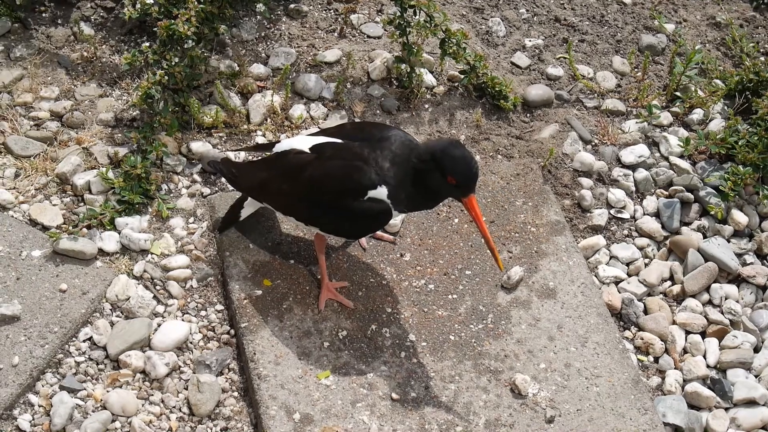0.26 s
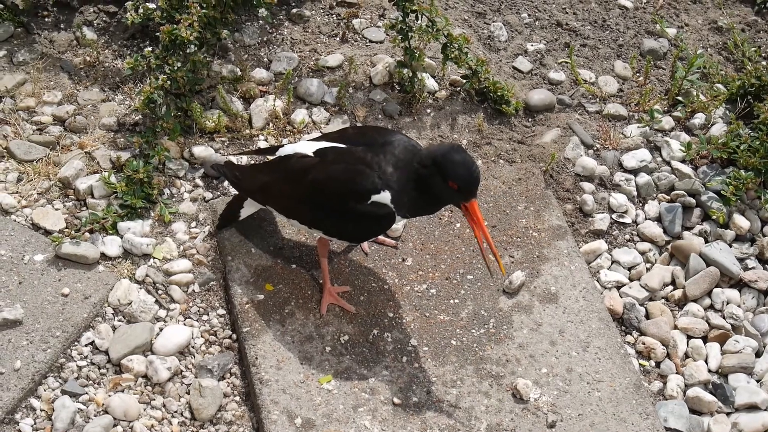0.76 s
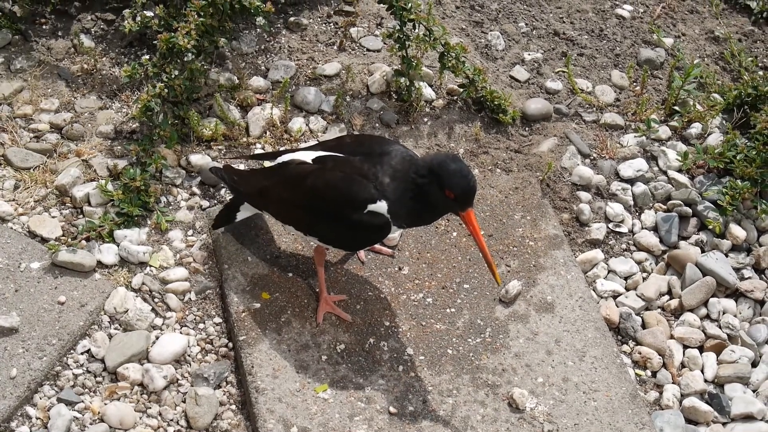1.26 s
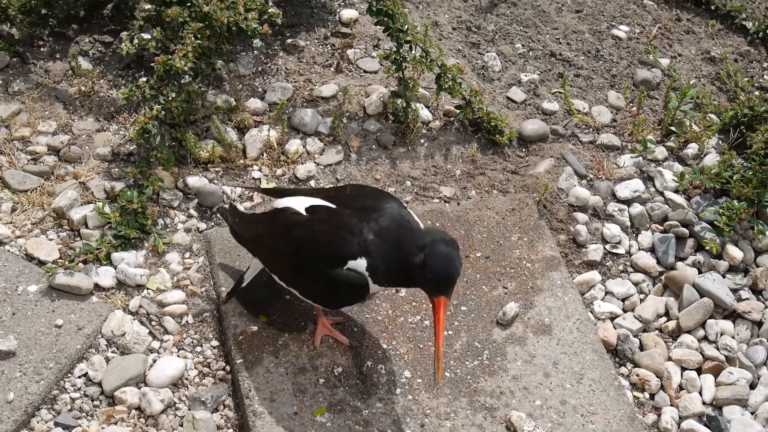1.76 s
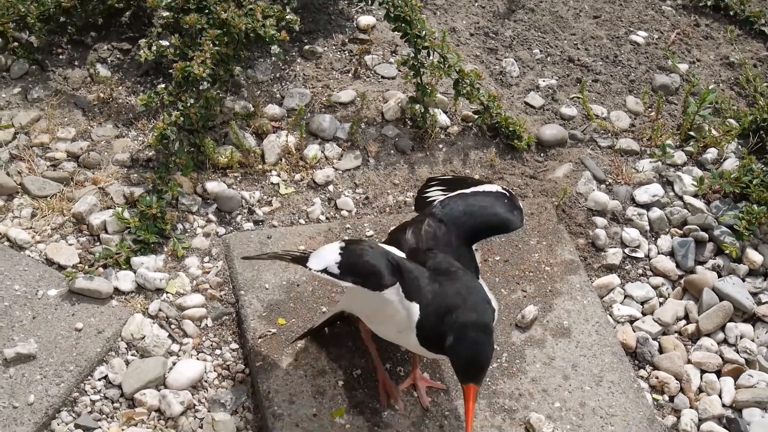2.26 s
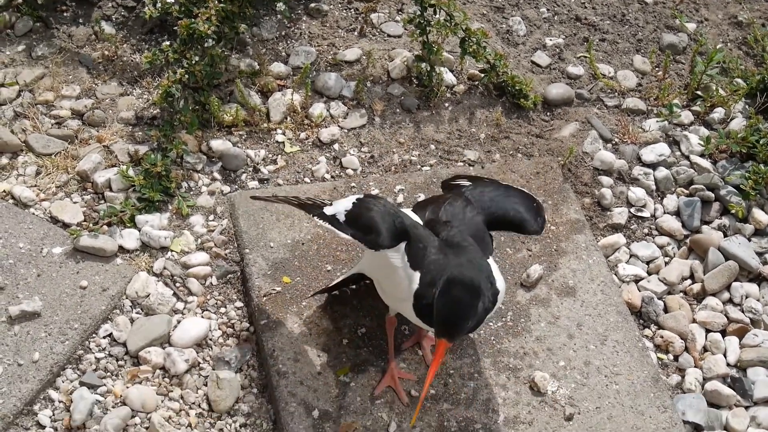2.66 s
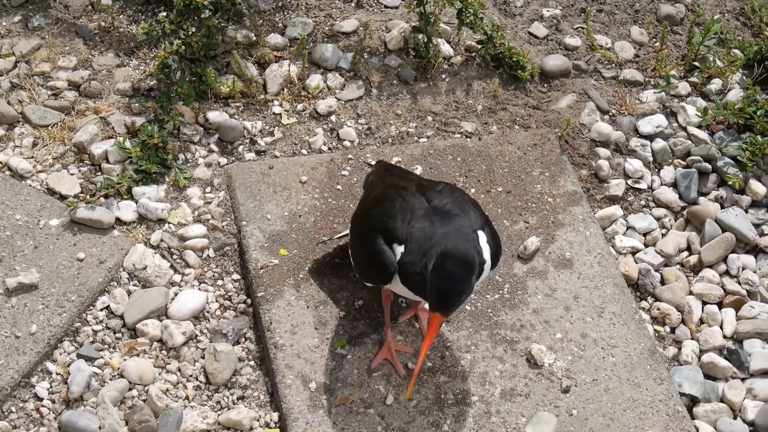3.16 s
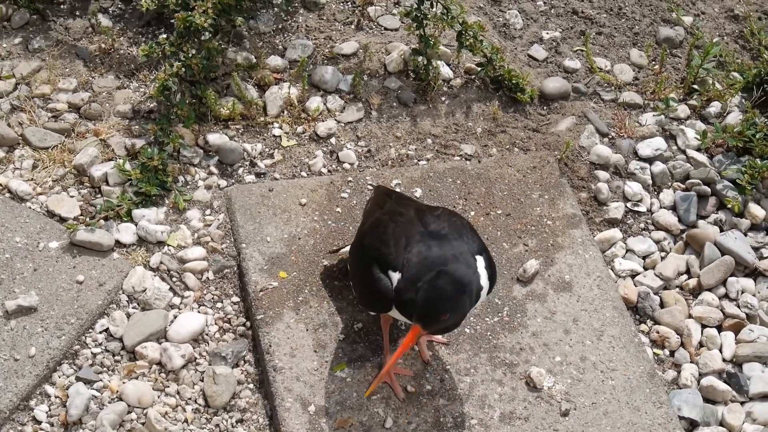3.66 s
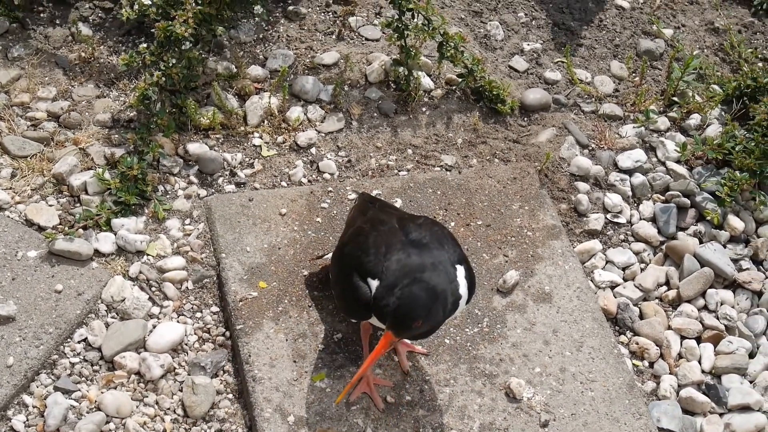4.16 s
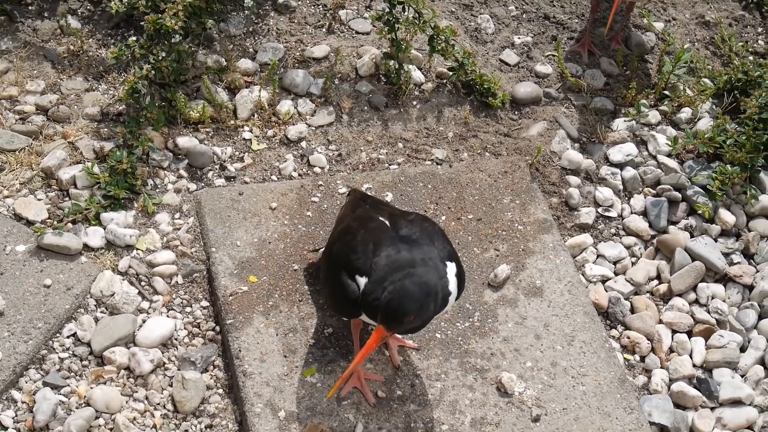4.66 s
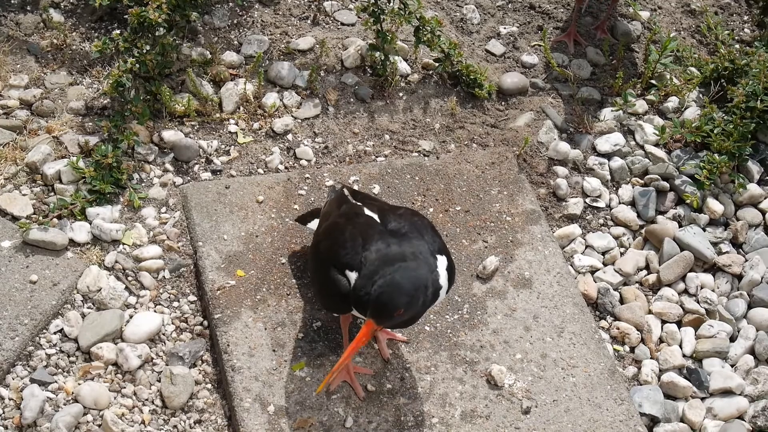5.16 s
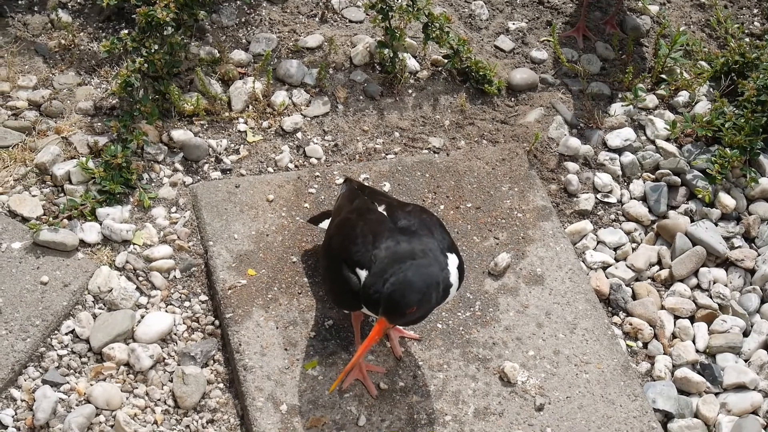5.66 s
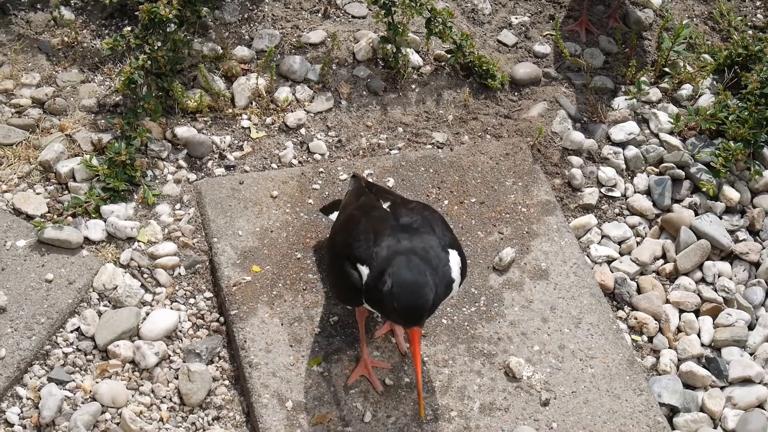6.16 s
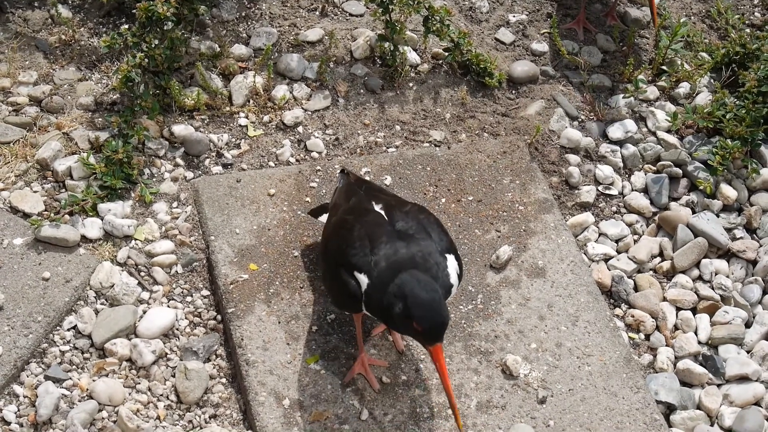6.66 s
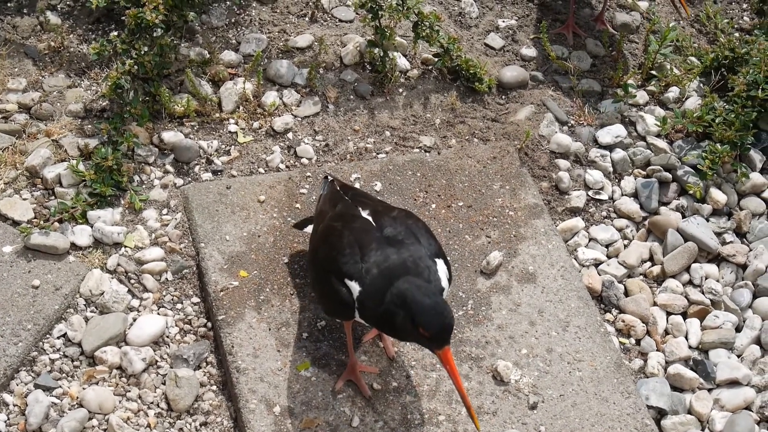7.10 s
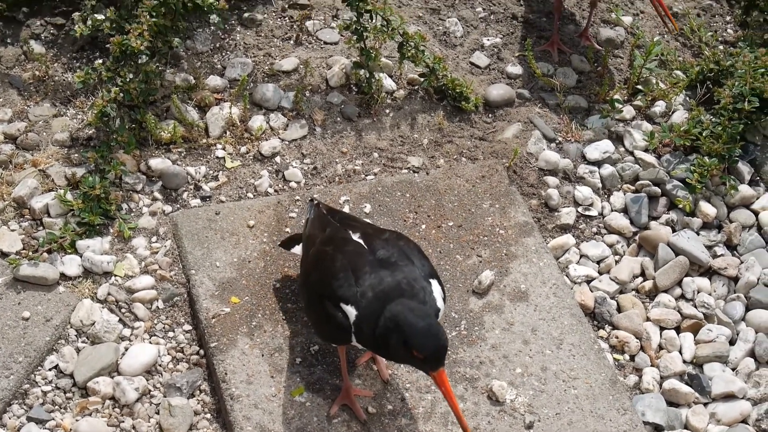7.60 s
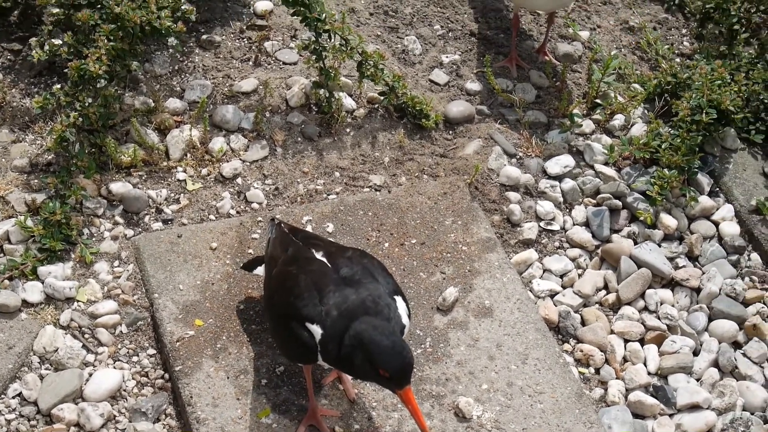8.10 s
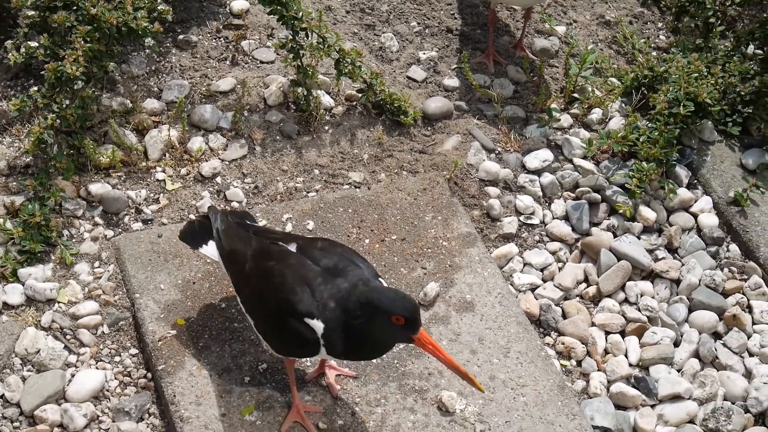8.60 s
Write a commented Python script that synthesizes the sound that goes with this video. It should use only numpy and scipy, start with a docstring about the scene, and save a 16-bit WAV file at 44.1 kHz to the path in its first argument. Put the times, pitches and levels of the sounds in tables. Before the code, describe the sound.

Piercing, very brief shorebird pips repeat unevenly, sometimes in tight pairs, with quick gravel scatter and faint echo over quiet low outdoor air.

```python
"""A quiet outdoor rumble with hiss, shaped from noise, starts a little loud and settles.
Soon oystercatchers pipe on a garden slab: each pip opens on a low note, flips up to an arched crest
and falls away, all in about 40 ms, built from five harmonics and a noisy rasp. Force hardens and brightens it.
Each pip bounces off the slab, scatters from gravel and returns as a long faint echo from houses, while
a limiter ducks everything. Near the end comes a faint low hoot, and the background swells again."""
import sys
import numpy as np
from scipy import signal
from scipy.fft import rfft, irfft
from scipy.io import wavfile
from scipy.ndimage import uniform_filter1d, minimum_filter1d

SR = 44100
rng = np.random.default_rng(int(sys.argv[2]) if len(sys.argv) > 2 else 0)


def wav_out(sig):
    """Save sig, one row per channel (or a flat mono array), as 16-bit PCM at SR to the path in sys.argv[1]."""
    wavfile.write(sys.argv[1], SR, np.round(np.clip(np.atleast_2d(sig).T, -1, 1) * 32767).astype(np.int16))


N = 389844


def gain_of(db):
    """Turns decibels into an amplitude factor."""
    return 10 ** (np.asarray(db) / 20)


def evened(x):
    """Scales a signal to an rms (average strength) of 1."""
    return x / np.sqrt(np.mean(x ** 2) + 1e-20)


def read(points, hz, axis=1):
    """Reads one column of a table between its points, on a log-frequency axis."""
    columns = np.transpose(points)
    return np.interp(np.log(hz + 1), np.log(columns[0] + 1), columns[axis])


def add(mix, s, sound):
    """Mixes a sound in at time s, in seconds."""
    part = mix[round(s * SR):][:len(sound)]
    part += sound[:len(part)]


def noise(spectrum, size):
    """Makes noise of rms 1 by shaping white noise with a table of levels."""
    hz = np.fft.rfftfreq(size, 1 / SR)
    white = rfft(rng.standard_normal(size))
    return evened(irfft(white * gain_of(read(spectrum, hz)), size))


def wobble(hz, size):
    """Makes random motion of rms 1, mostly slower than hz, by smoothing white noise."""
    f = np.fft.rfftfreq(size, 1 / SR)
    white = rfft(rng.standard_normal(size))
    return evened(irfft(white * np.exp(-(f / hz) ** 2) * (f > 0), size))


def bump(t, centre, width, height):
    """A smooth rise and fall around a moment."""
    return height * np.exp(-((t - centre) / width) ** 2)


def air(level_db=2, patchy_db=3.0, lean_db=0.5, treble_follow=0.52):
    """Distant outdoor rumble and hiss: noise in drifting patches of time and pitch, slowly settling."""
    # Tone of the background. Each row: frequency in Hz, relative level in dB.
    air_colour = [(25, -27.5), (50, -17), (85, -4.5), (140, -4), (250, -10), (400, -16), (530, -18),
                  (700, -14.5), (1400, -20.5), (2600, -23.5), (3400, -26), (3900, -34.5), (6500, -32),
                  (14300, -48)]
    # How alike left and right are. Each row: frequency in Hz, likeness (1 is identical).
    air_likeness = [(30, .5), (90, .95), (170, .9), (350, .76), (750, .77), (1500, .8), (5000, .17),
                    (14000, .3)]
    base_db, extra_db, settle_s = -68.5, 12.5, 4.6  # extra_db dies away over settle_s
    swell_s, swell_width_s, swell_db = 8.8, 0.61, 4.7

    frames, hz = N // 512 + 5, np.fft.rfftfreq(2048, 1 / SR)
    a, b, c, d, patches = rng.standard_normal((5, frames, len(hz)))
    patches = uniform_filter1d(patches, size=14, axis=0)
    patches = evened(uniform_filter1d(patches, size=8, axis=1))
    same = np.clip(read(air_likeness, hz), -1, 1)
    left = a + 1j * b
    right = same * left + np.sqrt(1 - same ** 2) * (c + 1j * d)
    z = np.array([left, right])

    t = np.arange(frames)[:, None] * 512 / SR
    db = base_db + extra_db * np.exp(-t / settle_s) + bump(t, swell_s, swell_width_s, swell_db)
    # the treble follows the changes of level less than the bass does
    follow = read([(1500, 0.90664), (6000, treble_follow)], hz)
    z *= gain_of(read(air_colour, hz) + patchy_db * patches + (db - db.mean()) * follow)
    sound = signal.istft(z.transpose(0, 2, 1), nperseg=2048, noverlap=1536)[1][:, :N]
    sides = np.array([[lean_db], [-lean_db]])  # left up, right down
    return gain_of(db.mean() + level_db + sides) * evened(sound)


def pip(row, scoop=.004, attack=0.0018, drop=.012, end_pitch=.65, jitter=0.002, shimmer=0.057,
        flutter=0.16, rasp_db=-30, rasp_per_force_db=-2, collapse_db=-3):
    """One pip: the syrinx (voice box) glides in pitch; gives the direct beam and the sound spread around."""
    # Pitch of the opening. Each row: share of the way to the flip, factor on the opening pitch.
    opening_pitch = [(0, 0.9264), (.35, 1.0269), (.7, 1.02), (1, 1.2312)]
    # Pitch of the crest. Each row: share of the way from flip to fall, factor on the crest pitch.
    crest_pitch = [(.06, .96), (.22, .992), (.42, 1.004), (.66, .992), (.85, .96), (1, .915)]
    # Tone of the rasp. Each row: frequency in Hz, relative level in dB.
    rasp_colour = [(300, -49.5), (1300, -36), (1800, -13.5), (2600, -3), (3300, -5), (3700, -21.5),
                   (4200, -22.5), (4900, -4.5), (6800, -2.5), (8000, -2.5), (9000, -12.5), (10000, -7),
                   (12500, -15), (15000, -29.5)]
    # Colour the throat gives the harmonics. Each row: frequency in Hz, gain in dB.
    throat_colour = [(1000, -18.5), (1500, -8), (2400, -6), (3500, -0.5), (3700, -8.5), (4150, -11),
                     (4700, -2), (7000, -3.5), (7800, 0.5), (8800, -12.5), (10000, -2.5), (12000, -5),
                     (14000, -14.5)]
    # force moves the crest from the fundamental to the octave: (dB in a plain pip, dB per unit of force)
    opening_gain, crest_gain, octave_gain, third_gain = (-1.1, 7), (0, -10.5), (-5, 8), (-16.5, -2.5)
    opening_octave_db = -5.5  # relative to the fundamental of the opening
    throat_peak = (2800, 120, 2)  # the fundamental swells near this pitch: Hz, width in Hz, dB
    fade_db_per_hz = 0.0218  # the fundamental fades across a climbing crest, swells across a sagging one
    # a sagging crest thins in the middle and is pushed out again just before the fall
    waist_db_per_hz, push_db_per_hz, push_before_s, push_width_s = -.02, .015, .003, .003

    s, flip, fall, low_hz, top_hz, climb_hz, level_db, force, scoop_db, fall_db = row
    t = np.arange(-scoop, fall + drop * 1.5, 1 / SR)  # seconds from the onset
    crest = fall - flip

    # the syrinx scoops up into its low register, flips to the high one, then goes slack
    contour = [(-scoop, 0.56 * low_hz), (-scoop / 4, .74 * low_hz)]
    contour += [(u * flip, k * low_hz) for u, k in opening_pitch]
    contour += [(flip + u * crest, k * top_hz + (u - .5) * climb_hz) for u, k in crest_pitch]
    contour += [(fall + drop, end_pitch * top_hz), (t[-1], .92 * end_pitch * top_hz)]
    hz = np.interp(t, *np.transpose(contour))
    # the voice is roughest where it flips and collapses
    unsteady = 1 + bump(t, flip, 0.0046, 2.5) + 3.8 * np.clip((t - fall) / drop * 2, 0, 1)
    shaky_hz = hz * (1 + jitter * unsteady * wobble(1500, len(t)))
    phase = 2 * np.pi * np.cumsum(shaky_hz) / SR

    knots = [-scoop, -attack / 2, attack / 2, 1.0 * flip, flip + 0.15 * crest,
             flip + 0.83912 * crest, fall + .15 * drop, fall + .7 * drop, t[-1]]

    def swell(start, opening, top, slack, fade=0):
        """Loudness of one harmonic through scoop, opening, crest and fall, with a little flutter."""
        levels = [start - 8, start, opening, opening, top + fade / 2, top - fade / 2,
                  slack, slack - 4, slack - 28]
        db = level_db + np.interp(t, knots, levels)
        return uniform_filter1d(gain_of(db), size=24) * (1 + flutter * wobble(140, len(t)))

    open_db, crest_db, octave_db, third_db = (
        plain + force * gain for plain, gain in (opening_gain, crest_gain, octave_gain, third_gain))
    start_db, open2_db = open_db + scoop_db, open_db + opening_octave_db
    first = swell(start_db, open_db, crest_db, fall_db, fade=fade_db_per_hz * climb_hz)
    first *= gain_of(bump(hz, *throat_peak))
    sag_hz = max(-climb_hz, 0)
    waist = bump(t, flip + crest / 2, crest / 4, waist_db_per_hz * sag_hz)
    push = bump(t, fall - push_before_s, push_width_s, push_db_per_hz * sag_hz)
    first *= gain_of(waist + push)
    second = swell(start_db - 7.5, open2_db, octave_db, fall_db - 6.5)
    third = swell(start_db - 17.0, open2_db - 13.5, third_db, third_db - 8.0)
    fourth = swell(start_db - 25.0, open2_db - 20.5, third_db - 13, third_db - 16.0, fade=4.5)

    partials = []
    for k in range(1, 6):
        tone = np.sqrt(2) * np.sin(k * phase) * gain_of(read(throat_colour, k * hz))
        partials.append(tone * (1 + k * shimmer * wobble(700, len(t))))
    power = np.hypot(first, second)  # joint strength of the two main harmonics
    # a rough burst as the note gives way
    collapse = bump(t, fall + drop / 2, drop / 2, gain_of(collapse_db))
    roughness = power * unsteady + power.max() * collapse
    rasp = gain_of(rasp_db + force * rasp_per_force_db) * roughness * noise(rasp_colour, len(t))
    overtones = third * partials[2] + fourth * (partials[3] + .3 * partials[4]) + rasp

    beam = first * partials[0] + second * partials[1] + overtones
    # away from the beam the two main harmonics are more evenly matched
    spread = 1.0507 * np.sqrt(power * first) * partials[0]
    spread += 0.99425 * np.sqrt(power * second) * partials[1] + overtones
    # the bill opens for the crest and throws it wider
    spread *= gain_of(np.interp(t, [0.18 * flip, flip], [-3.5, .5]))
    edges = signal.windows.tukey(len(t), .07)
    return s - scoop, beam * edges, spread * edges


def garden(x, wall_s=.19, wall_width=0.013, wall_db=4, first_s=0.0013):
    """Quick scatter from gravel and shrubs, then a faint long echo with a swell from a house wall."""
    # Each row: frequency in Hz, near scatter in dB, its time to die by 60 dB in seconds,
    # far echo in dB, its time to die by 60 dB in seconds.
    garden_echoes = [(1500, -13, 0.15, -35.5, 0.59), (2758.6, -9.5, 0.13, -34, 1.3),
                     (3187.6, -13, 0.13, -34, 1.2), (5070, -12, 0.098, -31.5, 0.41),
                     (6350.4, -14, .15, -37, .9), (7900, -6.5, 0.14, -34, 1.3),
                     (13970, -8, 0.12, -39.5, 0.33)]
    size = SR  # one second of echo
    hz, t, z = signal.stft(rng.standard_normal((3, size)), SR, nperseg=128)
    near_db, near_t60, far_db, far_t60 = (read(garden_echoes, hz, axis=k)[:, None] for k in range(1, 5))

    def decay(db, t60):
        """A dying envelope whose whole energy is db."""
        return gain_of(db - 60 * t / t60) * np.sqrt(2 * np.log(1000) / (t60 * SR))

    wall = gain_of(bump(t, wall_s, wall_width, wall_db))
    shape = np.hypot(decay(near_db, near_t60), decay(far_db, far_t60) * wall)
    shape *= np.clip(t / first_s - .5, 0, 1)  # silent until the first scatter arrives
    # share of the echo that left and right have in common
    same = np.clip(read([(3000, .75), (7000, 0.17), (11000, .2)], hz), 0, 1)[:, None]
    both = np.sqrt(same) * z[2] + np.sqrt(1 - same) * z[:2]
    tails = signal.istft(both * shape, SR, nperseg=128)[1]
    return signal.fftconvolve(x[None], tails, axes=1)[:, :N]


def ports(x, share):
    """The body around two microphone ports shades and delays each one differently with frequency."""
    # Full effect, at share 1. Each row: frequency in Hz, left minus right in dB, lead of the left in radians.
    port_lean = [(1000, 0, 0), (2600, -.4, .3), (3400, -.2, -.22), (5200, 2.5, -.4), (6800, 4.5, -.4),
                 (7800, 6, -1.1), (8800, 0, -.9), (10000, -9, -.8), (14000, -12, -.8)]
    hz = np.fft.rfftfreq(N, 1 / SR)
    lean = gain_of(share * read(port_lean, hz) / 2) * np.exp(.5j * share * read(port_lean, hz, axis=2))
    pair = np.array([lean, 1 / lean])
    return irfft(rfft(x) * pair / abs(pair.mean(0)), N)


def birds(bounce_s=(.0031, .0038), bounce_db=-17, lean_db=0.4104):
    """All pips: direct, off the slab (a little later at one port), and through the garden."""
    # Each row is a pip: onset in seconds, flip in seconds after it, fall in seconds after it,
    # opening pitch in Hz, crest pitch in Hz, climb across the crest in Hz, level in dB,
    # force (0 plain, 1 sharp, below 0 soft), scoop in dB relative to the opening, fall in dB relative to the pip.
    pip_rows = [(.228, .012, .042, 3129, 3625, 0.5, -62.5, 0.1076, -4.5, -1),
                (0.4426, 0.013842, .037, 2653, 3254, -40, -11.5, -0.0232, -28, -6),
                (0.835, .011, .032, 2541, 3224, -0.5, -10.5, 0.2682, -12, -20.5),
                (.84, 0.007453, .031, 2810, 3489, -0.5, -13.5, .5, -29, -24.5),
                (1.4088, 0.011903, .035, 2626, 3476, 140, -10, 0.5992, -13, -8),
                (1.431, .008, .028, 2702, 3291, 0.5, -17.5, -0.156, -20.5, -6),
                (1.7947, 0.009107, .044, 2645, 3444, 60, -11.5, 0.8882, -30, -13),
                (2.077, 0.016815, .043, 2622, 3345, 0, -16, -0.0398, -36, -10),
                (2.5, 0.008348, .036, 2381, 3365, 260, -11.5, 0.4436, -26.5, -28.5),
                (2.7115, 0.008939, .03, 2712, 3307, 100.5, -13.5, -0.304, -23, -8),
                (3.133, 0.005466, .034, 2520, 3141, 145, -12.5, -0.0027, -28, -22),
                (3.31, .012, .04, 3218, 3800, 0, -68.5, 0.323, -25.5, -4),
                (3.54, 0.0065, 0.021, 2358, 3138, 200, -16, -0.0596, -21.5, -14),
                (3.557, 0.007194, 0.024, 2384, 3341, 201, -10, -0.0422, -22, -32),
                (3.832, 0.00864, .032, 2658, 3323, -59, -15.5, 0.3484, -15, -18.5),
                (4.299, 0.006007, .028, 2546, 3256, 80.5, -16, 0.0029, -17, -22.5),
                (4.4362, 0.010457, 0.032, 2580, 3437, 60, -14.5, 0.1176, -13.5, -24),
                (5.012, 0.009248, 0.031016, 2742, 3222, -160, -14, -0.0401, -26.5, -7.5),
                (5.184, 0.009294, .037, 2668, 3440, 49.5, -12, 0.193, -29.5, -6),
                (5.239, .013, .033, 2790, 3300, -200, -17.5, 0.1631, -35.5, -5.5),
                (5.913, 0.008952, .033, 2658, 3265, -140, -14, 0.1248, -31.5, -10),
                (6.078, 0.01114, .034, 2612, 3437, 41, -12.5, -0.018, -15, -4.5),
                (6.277, 0.009243, 0.035464, 2660, 3237, -100, -16, 0.0561, -28.5, -7),
                (6.643, 0.010076, .032, 2657, 3447, -0.5, -15.5, 1.0656, -27.5, -7.5),
                (6.883, 0.010063, .03, 2742, 3285, -200, -14.5, 0.0041, -26.5, -5),
                (7.4414, 0.008253, .032, 2648, 3425, 19.5, -15, 0.849, -23.5, -10),
                (7.516, .009, .031, 2721, 3237, -200, -17.5, -0.1292, -30.5, -5.5),
                (8.22, 0.012976, 0.05094, 3109, 3864, 1.5, -52, -1.5965, -6, -1),
                (8.2837, 0.008299, .036, 2612, 3444, 61, -14, 0.8597, -25.5, -8.5)]
    direct, around = np.zeros((2, N)), np.zeros(N)
    for row in pip_rows:
        s, beam, spread = pip(row)
        path = rng.uniform(0.62, 1.4)  # the bounce delay changes as the birds bob
        for port, side, delay in zip(direct, (1, -1), bounce_s):
            add(port, s, gain_of(side * lean_db / 2) * beam)
            add(port, s + path * delay, gain_of(bounce_db) * spread)
        add(around, s, spread)
    return ports(direct, share=1) + ports(garden(around), share=0.67)


def hoot(level_db=-74, under_db=-6):
    """A soft low note, far away, that arches up once, with a weaker partial a fifth beneath it."""
    start_s, length_s, base_hz = 8.42, .4, 407
    lift_s, lift_width_s, lift_hz = .16, .08, 56  # lift_s counts from the start of the hoot
    t = np.arange(0, length_s, 1 / SR)
    hz = base_hz + bump(t, lift_s, lift_width_s, lift_hz)
    phase = 2 * np.pi * np.cumsum(hz * (1 + 0.007538 * wobble(40, len(t)))) / SR
    lower = np.sin(2 / 3 * phase)
    note = np.sqrt(2) * (np.sin(phase) + gain_of(under_db) * lower)
    out = np.zeros(N)
    add(out, start_s, note * gain_of(level_db) * signal.windows.tukey(len(t), .35))
    return out


def scene():
    """The outdoor background, the birds and the hoot together."""
    return air() + birds() + hoot()


def record(dry, threshold_db=-22, squeeze=0.58013, recover_db=90, lag_s=0.0039):
    """A limiter reacts late, so pips start loud and then everything is ducked; last, the top is cut."""
    edge_hz, ceiling = 14300, .61
    power_db = 10 * np.log10(abs(uniform_filter1d((dry ** 2).mean(0), size=90)) + 1e-12)
    fall = np.arange(N) * recover_db / SR  # after a peak the level reading falls recover_db a second
    held_db = np.maximum.accumulate(power_db + fall) - fall
    over_db = np.maximum(held_db - threshold_db, 0)
    hold = np.exp(-1 / (lag_s * SR))
    ducking_db = squeeze * signal.lfilter([1 - hold], [1, -hold], over_db)
    ducked = dry / gain_of(ducking_db)
    # a faster stage holds the loudest peaks near a ceiling
    peak = -minimum_filter1d(-abs(ducked).max(0), size=160)
    ducked = ducked * uniform_filter1d(ceiling / np.maximum(peak, ceiling), size=120)
    low_pass = signal.firwin(201, edge_hz, window=("kaiser", 9), fs=SR)
    return signal.oaconvolve(ducked, low_pass[None], "same")


dry = scene()
out = record(dry)
wav_out(out)
```